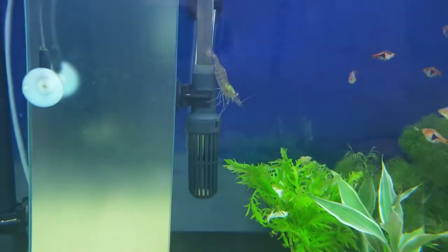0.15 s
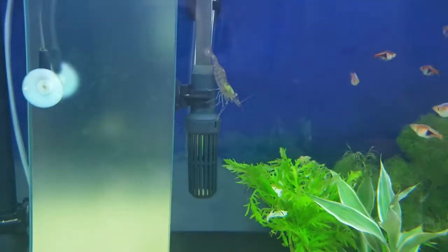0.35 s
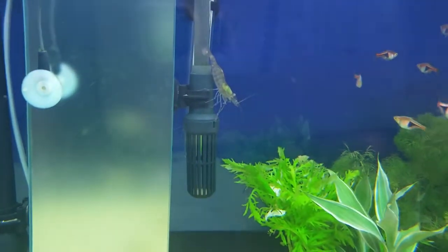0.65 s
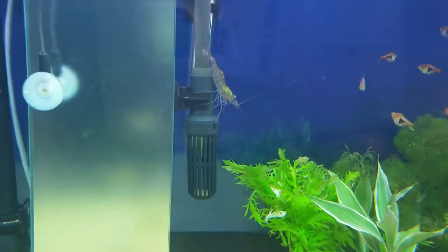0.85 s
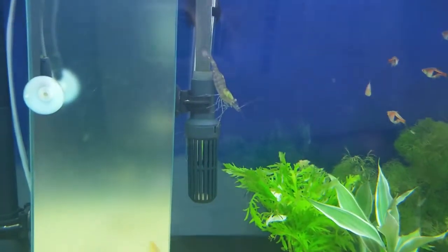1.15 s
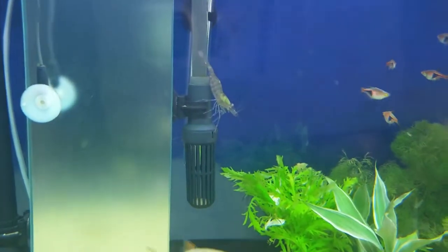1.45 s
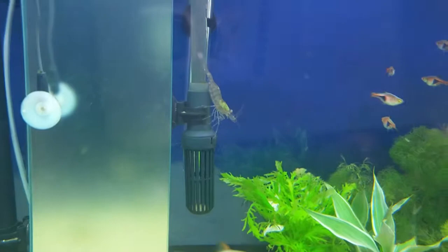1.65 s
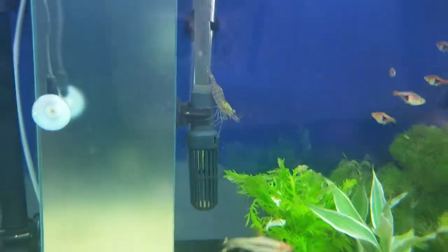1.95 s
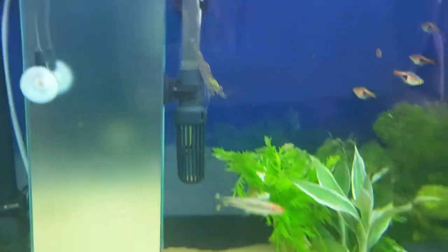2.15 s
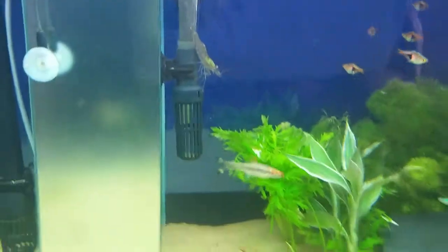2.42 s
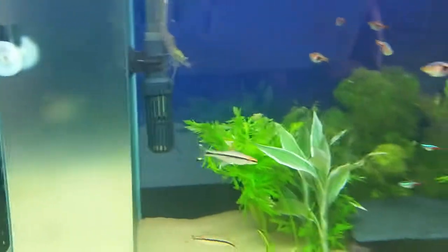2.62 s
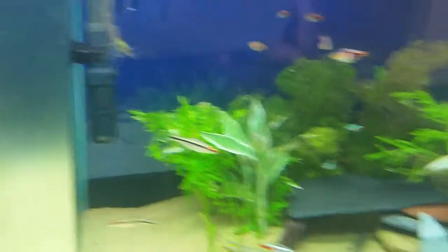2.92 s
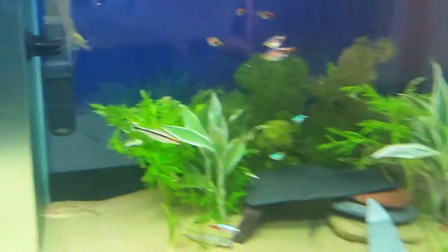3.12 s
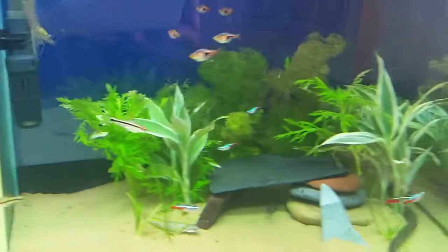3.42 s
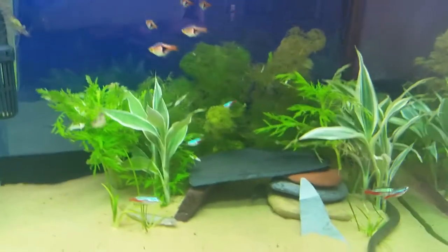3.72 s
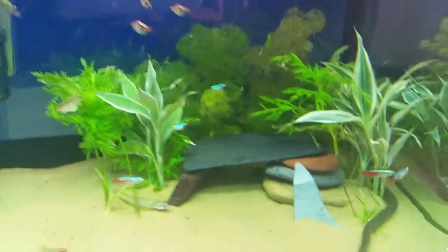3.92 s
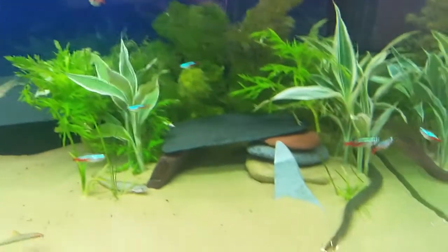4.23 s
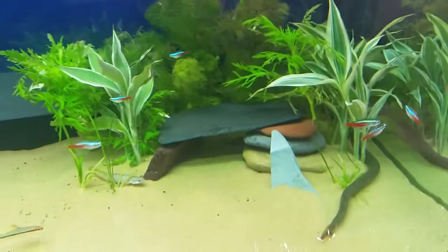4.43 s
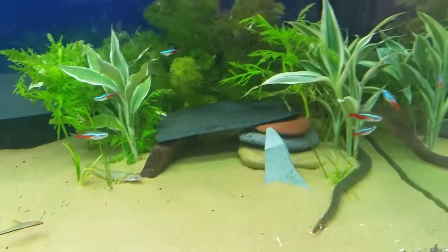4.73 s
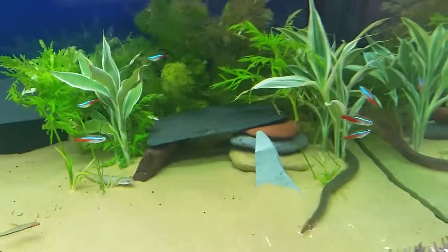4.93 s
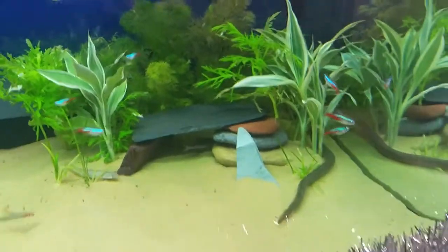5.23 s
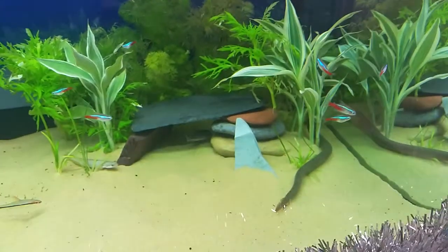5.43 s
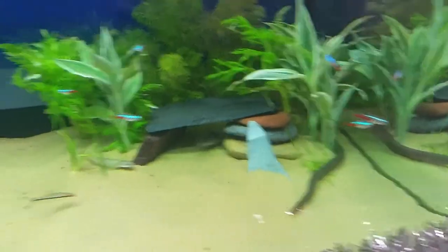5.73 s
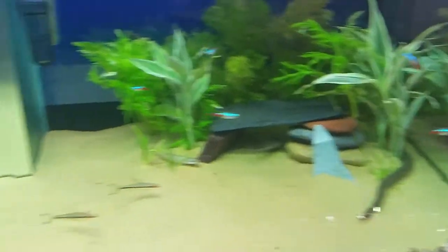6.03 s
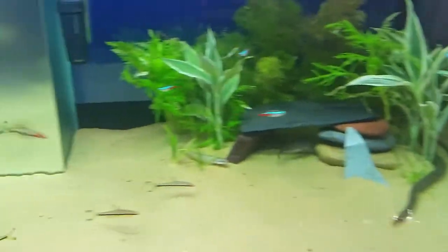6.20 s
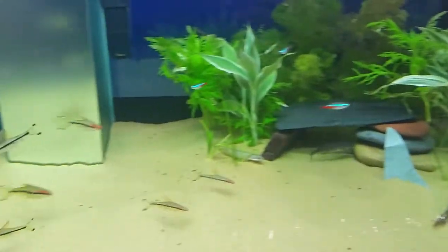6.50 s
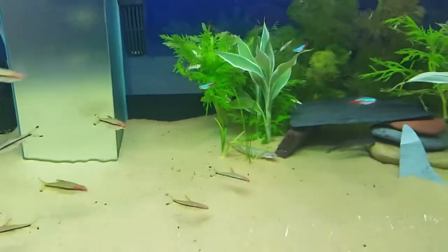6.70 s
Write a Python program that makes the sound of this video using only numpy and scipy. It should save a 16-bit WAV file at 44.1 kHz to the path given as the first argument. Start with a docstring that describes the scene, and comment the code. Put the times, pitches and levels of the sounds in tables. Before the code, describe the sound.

A filter pump in an indoor fish tank gives a quiet, steady, low electrical hum throughout, heard from a handheld microphone moving along the glass. Circulating water rumbles in gentle surges and washes at the surface, under a soft, grainy fizz and a thin hiss. Two soft knocks make the tank boom briefly right at the start. Tiny, high bubble pings come often from 0.5 to 1.9 seconds, then only now and then. Between 2.1 and 2.5 seconds come more dull knocks with short hand rubs, and faint handling rustle lingers until about 3.4 seconds. From 3 seconds the hum and rumble fade a little as the microphone turns away. A last cluster of knocks lands at about 4.2 seconds with a rub and a short tick. From around 5.6 seconds to the end, near 7 seconds, a faint, narrow ring swells within the fizz.

```python
"""A mains-driven filter pump hums in a fish tank, heard from a handheld camera moving along the glass.
From the start, water rumbles and washes along the surface under a soft, grainy fizz and a thin hiss.
Two soft knocks set the tank booming at once, and bubbles ping from 0.5 s on. More knocks come at
2.1-2.4 s, with dull rubs and faint handling rustle. From 3 s the hum and rumble fade a little as the
camera turns away. The last knocks land at 4.2 s with a rub and a tick; near the end a narrow ring swells."""
import sys
import numpy as np
from scipy import signal
from scipy.fft import rfft, irfft
from scipy.io import wavfile
from scipy.ndimage import uniform_filter1d

SR = 44100
rng = np.random.default_rng(int(sys.argv[2]) if len(sys.argv) > 2 else 0)


def dump(signal):
    """Clip the signal to [-1, 1] and save it as 16-bit WAV at the path in sys.argv[1]."""
    limited = np.clip(np.atleast_2d(signal).T, -1, 1)
    pcm = np.round(limited * 32767).astype(np.int16)
    wavfile.write(sys.argv[1], SR, pcm)


N = 302526
TIME = np.arange(N) / SR
LEFT_RIGHT = np.array([[1], [-1]])


def undb(db):
    """Decibels to gain."""
    return 10 ** (np.asarray(db) / 20)


def pan(pan_db):
    """Two channel gains; pan is left minus right in dB throughout."""
    return undb(LEFT_RIGHT * pan_db / 2)


def walk(rate_hz):
    """Random steps, smoothed twice; spread near 1."""
    hold = int(SR / rate_hz)
    steps = rng.standard_normal(1000)[np.arange(N) // hold % 1000]
    return 1.3 * uniform_filter1d(uniform_filter1d(steps, hold), hold)


def course(table):
    """A level curve in dB about its mean."""
    db = np.interp(TIME, *np.transpose(table))
    return db - db.mean()


def swells(table):
    """Summed bell curves in time, one signal per height column."""
    return sum(np.outer(heights, np.exp(-((TIME - crest_s) / width_s) ** 2))
               for crest_s, width_s, *heights in table)


def over_hz(hz, values):
    """Points joined over log frequency, one value per bin."""
    return np.interp(np.log(np.fft.rfftfreq(N, 1 / SR) + 1), np.log(hz), values)


def colour(white, spectrum):
    """Shape stereo white noise to a spectrum that falls steeply past its ends."""
    hz, db, pan_db = np.transpose(spectrum)
    shape_db = over_hz(np.r_[hz[0] / 8, hz, hz[-1] * 8], np.r_[db[0] - 120, db, db[-1] - 120])
    gain = undb(shape_db) * pan(over_hz(hz, pan_db))
    return irfft(rfft(white) * gain * np.sqrt(SR / 2), N)


# Hum partials. Each row: multiple of the mains, level in dB, pan in dB, dB per dB of nearness,
# left phase lead in radians.
HUM_PARTIALS = [(1, -51, -1, 0.5, -0.12), (2, -61, 0, 0.4, 0.37), (3, -61, -2.5, .5, 0.26),
                (4, -63.5, -3, 0.5, 0.41), (5, -62, 1, 0.96, -0.13), (6, -64, 3, 1.3, -0.54),
                (7, -59.5, 0.1, .2, 0.14), (8, -63, 2.5, 0.9, -0.012), (11, -83, 9.5, 3, 0.14),
                (12, -83.5, -3.5, 3.5, -0.095), (14, -88.5, 1, 4, -0.014), (15, -86, -10.5, 1.5, 0),
                (17, -88.5, 12, 5, 0.45), (18, -80.5, 4.5, 2, 0), (19, -90, -1.5, -0.5, 0.099)]

def pump(near_db, mains_hz=49.97, dispersion_rad=0.6, drift_rad=0.048, waver_db=0.9):
    """The rotor kicks the casing once a mains cycle; the glass spreads each kick into a drone."""
    hum = 0
    for order, db, pan_db, share, lead_rad in HUM_PARTIALS:
        # Bending-wave speed depends on pitch.
        lag_rad = dispersion_rad * order ** 2 + drift_rad * walk(2.4) - LEFT_RIGHT * lead_rad / 2
        tone = np.sqrt(2) * np.cos(2 * np.pi * order * mains_hz * TIME - lag_rad)
        # Each partial has its own standing wave, so position affects each differently.
        level_db = db + share * near_db + waver_db * walk(2.926)
        hum += tone * undb(level_db) * pan(pan_db)
    return hum


# Likeness at the two microphones. Each row: frequency in Hz, correlation from 0 to 1.
MIC_CORRELATION = [(25, 0.9), (75, 0.9), (125, 0.6), (215, 0.8), (310, 0.5), (410, .53), (500, .25),
                   (780, 0.1), (1050, 0)]

def rush(spectrum, gain_db, waver_db):
    """Uneven low noise; its long waves reach both microphones much alike."""
    likeness = over_hz(*np.transpose(MIC_CORRELATION))
    mid, side = rfft(rng.standard_normal((2, N)))
    white = irfft(mid * np.sqrt((1 + likeness) / 2) + LEFT_RIGHT * side * np.sqrt((1 - likeness) / 2), N)
    return colour(white, spectrum) * undb(gain_db + waver_db * walk(7))


# Tank boom and flow rumble. Each row: frequency in Hz, density in dB, pan in dB.
BOOM_SPECTRUM = [(15.3, -80.5, 5.5), (34.1, -88, 7), (59, -77, -2), (74.4, -69, -2), (113.3, -88, -2.5)]
RUMBLE_SPECTRUM = [(110, -81.5, 0.5), (173, -81.5, 1), (213, -81.5, 3.5), (286, -87.5, -0.5),
                   (364, -83, 1.5), (391, -90.5, -1), (459, -87.5, 5), (542, -99, 0)]
# Surges and lulls. Each row: crest and half-width in seconds, boom gain in dB, rumble gain in dB.
WATER_SURGES = [(.15, 0.13, 4.5, -0.5), (.62, 0.2, 2.5, 0), (1.22, 0.15, 8, -0.5), (1.78, .12, 3, -1),
                (2.6, 0.2, -0.5, 0.5), (3.22, 0.13, -5, -2.3), (3.92, 0.08, 6.5, 2), (4.65, 0.12, 9, 0.5)]

def circulation(near_db):
    """Circulating water rumbles in surges over the tank's low boom."""
    boom_surge_db, rumble_surge_db = swells(WATER_SURGES)
    boom = rush(BOOM_SPECTRUM, -2 + 0.19 * near_db + boom_surge_db, waver_db=0.75)
    rumble = rush(RUMBLE_SPECTRUM, 0.2 + 0.84 * near_db + rumble_surge_db, waver_db=1.14)
    return boom + rumble


# Surface wash. Each row: frequency in Hz, density in dB, pan in dB.
WASH_SPECTRUM = [(490, -97.5, -1), (613, -98, 1.5), (862, -100.3, -1.5), (1120, -103.5, -1.5),
                 (1357, -108.5, -4)]
# Its level. Each row: time in seconds, gain in dB.
WASH_GAIN = [(0, 3), (1.1, 1), (1.7, 2), (2.3, 1.5), (2.6, 2.5), (3.05, 3.7), (3.3, 1.5), (4.0, 2),
             (4.7, 0), (5.4, -1.5), (6.0, 0.4), (6.86, -3)]

def surface_wash():
    """Water washes along the surface."""
    return rush(WASH_SPECTRUM, np.interp(TIME, *np.transpose(WASH_GAIN)), waver_db=1.0)


# Fizz bands: lower, upper, narrow ring. Each row: frequency in Hz, density in dB, pan in dB.
LOWER_SPECTRUM = [(1374, -117, 11.5), (1586, -102.6, 8.5), (1920, -102.5, 3), (2224, -111, 13)]
UPPER_SPECTRUM = [(1820, -109, 2.9), (2150, -102.5, 6.5), (2496, -106, 6.6), (2820, -116, 3.8),
                  (3350, -128, 11)]
RING_SPECTRUM = [(1480, -119, 11), (1650, -103, 11.5), (1820, -105, 10), (2160, -109, 11), (2370, -119, 7)]
# Fizz strength. Each row: time in seconds, relative level in dB.
FIZZ_LEVEL = [(0.0, -81), (0.55, -78), (1.6, -77.5), (2.45, -75), (3.4, -76.5), (4.8, -81), (5.4, -78.5),
              (6.2, -81), (6.86, -79)]
# Swells of the ring. Each row: crest and half-width in seconds, rise in dB.
RING_SWELLS = [(.76, .05, 7.5), (1.85, .2, 10), (6.1, 0.5, 15), (6.75, 0.47, 10)]

def fizz(grains_per_s=170, grain_db=-6.5, noise_db=-2.0, flicker_db=0.75):
    """A soft, grainy fizz at 1.6-2.5 kHz, with a narrow ring that swells most near the end."""
    level_db = course(FIZZ_LEVEL)
    flicker = undb(flicker_db * walk(18))
    bands = ((LOWER_SPECTRUM, 0.5 + level_db),
             (UPPER_SPECTRUM, 0.44 * level_db),
             (RING_SPECTRUM, -12.5 + swells(RING_SWELLS)))
    mix = 0
    for spectrum, gain_db in bands:
        onsets = rng.random((2, N)) < grains_per_s / SR
        grains = onsets * rng.standard_normal((2, N)) * np.sqrt(SR / grains_per_s)
        noise = rng.standard_normal((2, N))
        mix += colour(undb(noise_db) * noise + undb(grain_db) * grains, spectrum) * undb(gain_db)
    return mix * flicker


# Thin hiss. Each row: frequency in Hz, density in dB, pan in dB.
HISS_SPECTRUM = [(2630, -119, -11), (4240, -120.5, 1), (4900, -122.5, -7.5), (6200, -132.5, -5.5),
                 (6840, -125.5, -9.5), (7250, -129, -4.5), (8030, -121, 10), (8150, -128, 3.5),
                 (10780, -127.5, 1.5), (12160, -118, 2.5), (14200, -118.5, 0)]
# Handling rustle. Each row: crest and half-width in seconds, rise in dB.
RUSTLE_SWELLS = [(1.6, 0.35, 0), (2.28, .04, 2), (2.55, 0.24, 3), (3.09, 0.1, 3.5), (3.35, 0.17, 1)]

def hiss_and_rustle(near_db, flicker_db=0.78):
    """Thin hiss, with swells of faint handling rustle."""
    gain_db = -0.72 + 0.36 * near_db + swells(RUSTLE_SWELLS) + flicker_db * walk(12)
    return colour(rng.standard_normal((2, N)), HISS_SPECTRUM) * undb(gain_db)


def push(start_s, contact_s, db):
    """A smooth force pulse; longer contact gives a duller thud."""
    force = np.sin(np.pi * np.clip((TIME - start_s) / contact_s, 0, 1)) ** 2
    return undb(db) * force / force.sum()


# Knocks. Each row: start in seconds, strength in dB, contact in seconds, pan in dB.
KNOCKS = [(0.026, -37, 0.0037, -7.5), (.048, -39, 0.0031, -8), (2.1467, -43, 0.0023, -5),
          (2.1704, -38, 0.0045, -17), (2.181, -28.5, 0.0067, 2), (2.2009, -36.5, 0.0035, 12),
          (2.4096, -39, 0.0055, 10), (2.441, -30.5, 0.0066, 11), (4.2006, -32.5, 0.00326, -8),
          (4.205, -34.5, 0.0029, 15), (4.2178, -28.5, 0.0055, 2), (4.2305, -39, .009, 2),
          (4.3214, -35, 0.0091, 4)]
# Tank modes. Each row: frequency in Hz, gain in dB, t60 in seconds.
TANK_MODES = [(74, -11.5, 0.2), (108, -5.5, 0.07), (177, -6, 0.06), (247, -5, 0.04), (331, -9.5, 0.059),
              (434.5, -3.5, 0.077), (508, -12.5, 0.09), (870, -13, 0.037)]

def knocks():
    """Soft pushes, each nearer one microphone, ring the tank's modes."""
    age_s = TIME[:SR // 2]
    pushes = sum(push(start_s, contact_s, db) * pan(pan_db) for start_s, db, contact_s, pan_db in KNOCKS)
    ring = sum(undb(db) * np.exp(-np.log(1000) * age_s / t60_s) * np.cos(2 * np.pi * hz * age_s)
               for hz, db, t60_s in TANK_MODES)
    return signal.fftconvolve(pushes, ring[None], axes=1)[:, :N]


def ping(start_s, db, hz, t60_s, glide_per_s=0):
    """A short ring that builds over two cycles and may rise in pitch."""
    age_s = TIME[:SR // 10]
    envelope = np.minimum(age_s * hz / 2, 1) * np.exp(-np.log(1000) * age_s / t60_s)
    ring = undb(db) * envelope * np.sin(2 * np.pi * hz * age_s * (1 + glide_per_s * age_s))
    return np.r_[np.zeros(int(start_s * SR)), ring, np.zeros(N)][:N]


# Bubbles. Each row: start in seconds, level in dB, starting pitch in Hz.
BUBBLES = [(.5013, -63, 2040), (.612, -64, 1880), (.636, -65, 2020), (0.7493, -62, 1710), (.765, -64, 1660),
           (0.88, -62, 1910), (.9542, -62, 2110), (1.0076, -61, 2180), (1.054, -64, 2260),
           (1.0827, -64, 1670), (1.2765, -61, 2100), (1.4162, -67, 1730), (1.535, -64, 1640),
           (1.587, -59.5, 2000), (1.66, -63, 2060), (1.704, -63, 1560), (1.775, -59, 1730),
           (1.891, -66, 2090), (2.7358, -65, 1800), (2.8624, -63, 2030), (2.9637, -64, 1790),
           (3.3993, -63, 2040), (5.005, -65, 2040), (5.3687, -63, 2050), (6.7472, -64, 1700)]

def bubbles(t60_s=0.031, glide_per_s=1.5, pan_db=7):
    """Each bubble rings briefly, rising in pitch as it nears the surface."""
    return sum(ping(start_s, db, hz, t60_s, glide_per_s) for start_s, db, hz in BUBBLES) * pan(pan_db)


# Hand rubs. Each row: crest and half-width in seconds, gain in dB, pan in dB.
RUBS = [(2.206, 0.029, -4, 4.5), (2.432, 0.028, -4.5, 3.5), (2.8, 0.088, -11.5, -3), (4.216, 0.0096, 2, 5)]
# Rub noise. Each row: frequency in Hz, density in dB, pan in dB.
RUB_SPECTRUM = [(121, -79.5, 5), (216, -66, -5.5), (320, -75, 11), (445, -72.5, 0.5), (565, -89.5, 4),
                (805, -100, 4)]

def hand_rubs():
    """The hand shifts on the camera in short, dull, uneven rubs."""
    grip = swells([(crest_s, width_s, *(undb(db) * pan(pan_db)))
                   for crest_s, width_s, db, pan_db in RUBS])
    return rush(RUB_SPECTRUM, 0, waver_db=4.0) * grip


# Knock tick. One row: level in dB, pitch in Hz, t60 in seconds.
TICK_RING = (-45.5, 736, 0.013)

def tick(start_s=4.199):
    """A short tick as the last cluster of knocks lands."""
    return ping(start_s, *TICK_RING)


# Nearness to the pump. Each row: time in seconds, relative level in dB.
PUMP_NEARNESS = [(0.0, -55), (0.65, -55.5), (1.97, -56), (2.9, -55.5), (3.3, -56.5), (4.4, -58.5),
                 (5.5, -59.5), (6.86, -59)]

def scene():
    """Stereo mix; circulation, hiss and hum follow the nearness to the pump."""
    near_db = course(PUMP_NEARNESS)
    water = circulation(near_db) + surface_wash()
    background = water + fizz() + hiss_and_rustle(near_db) + pump(near_db - 0.82)
    return background + knocks() + bubbles() + hand_rubs() + tick()


def record(dry, top_hz=14600, fade_s=0.004):
    """The camera cuts the top steeply; both ends fade briefly."""
    edge_s = np.minimum(TIME, TIME[::-1])
    fade = np.sin(np.pi / 2 * np.minimum(edge_s / fade_s, 1)) ** 2
    lowpass = signal.ellip(14, 0.1, 80, top_hz, fs=SR, output="sos")
    return signal.sosfilt(lowpass, dry * fade)


dry = scene()
out = record(dry)
dump(out)
```